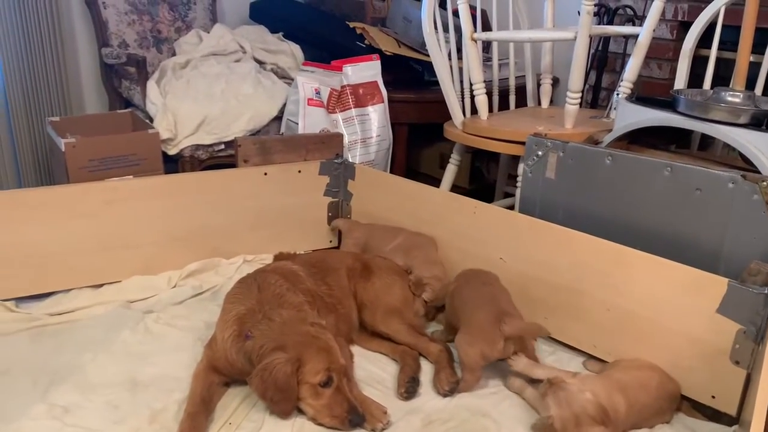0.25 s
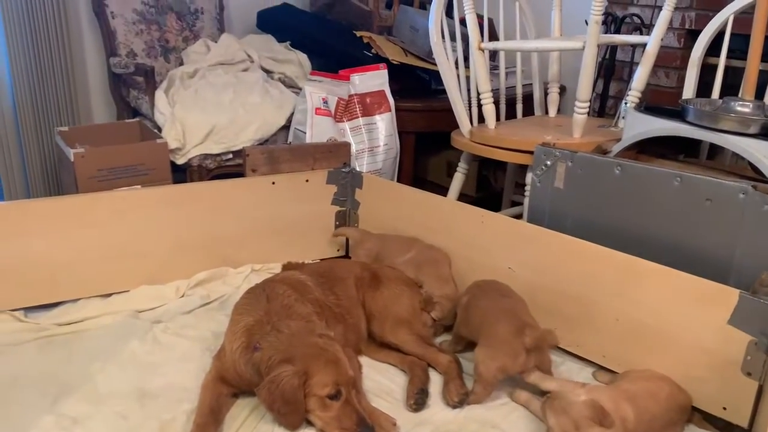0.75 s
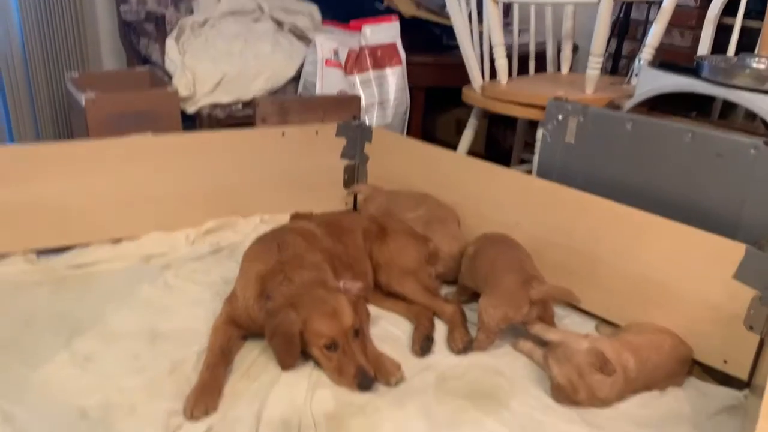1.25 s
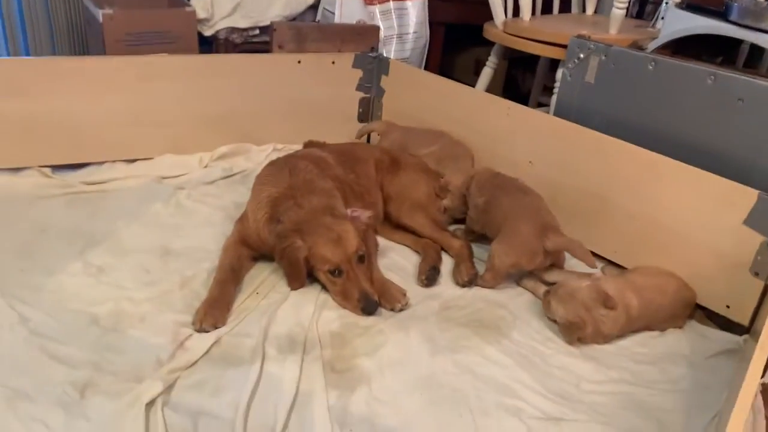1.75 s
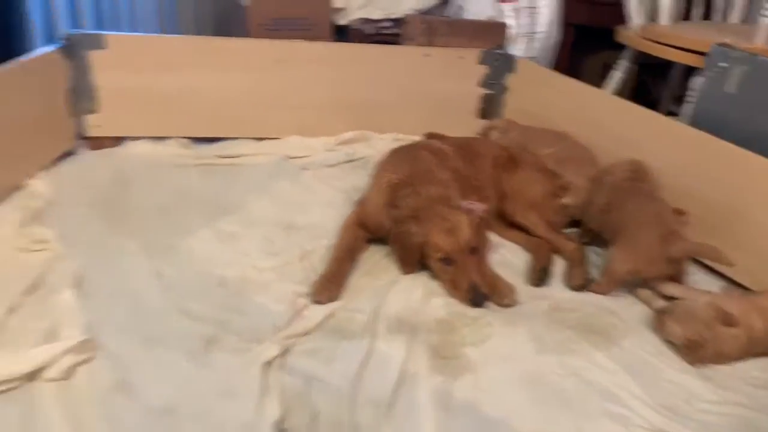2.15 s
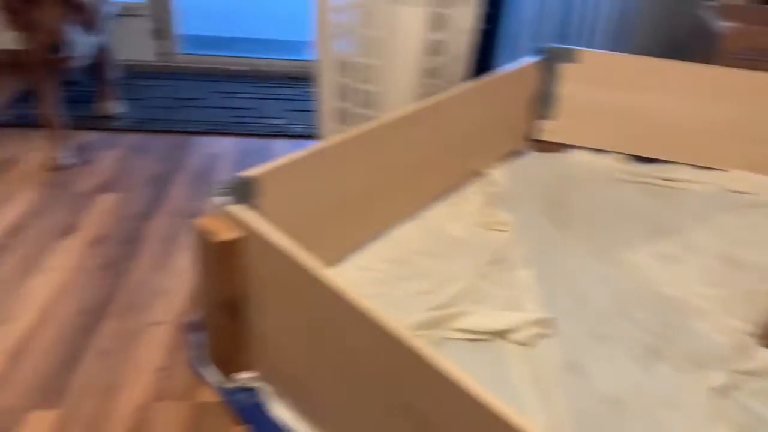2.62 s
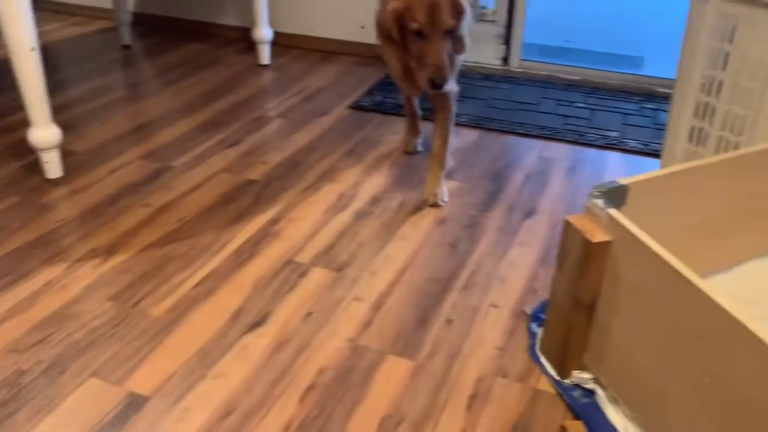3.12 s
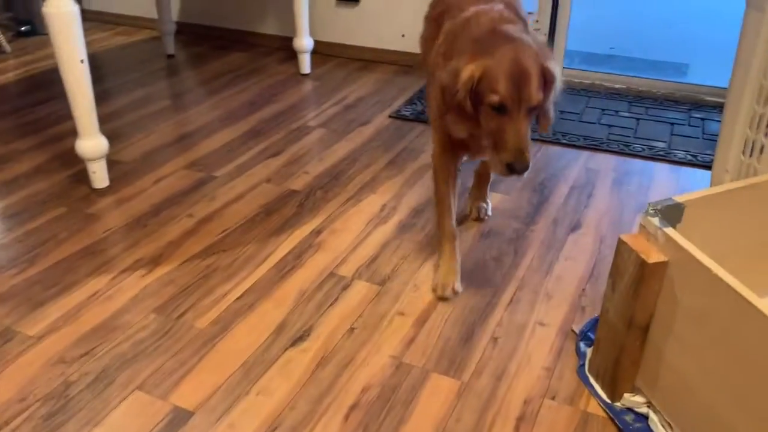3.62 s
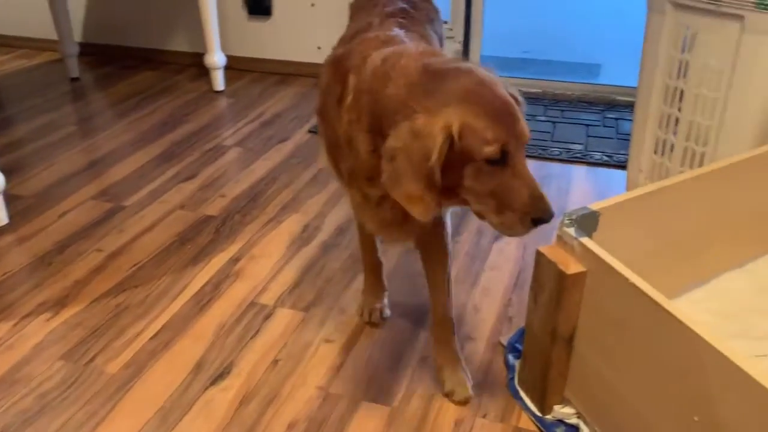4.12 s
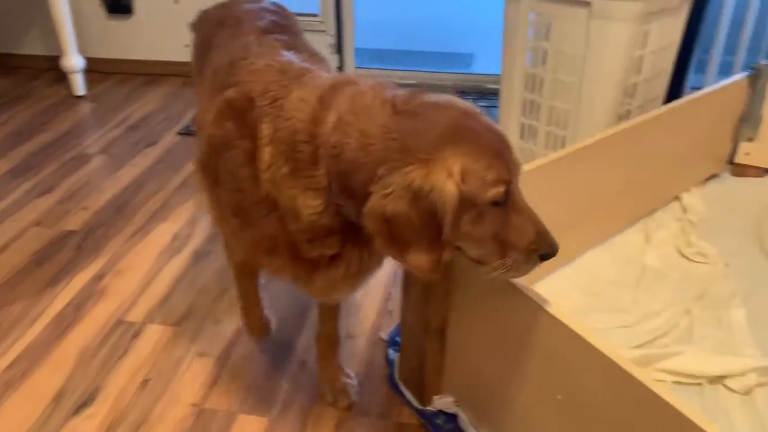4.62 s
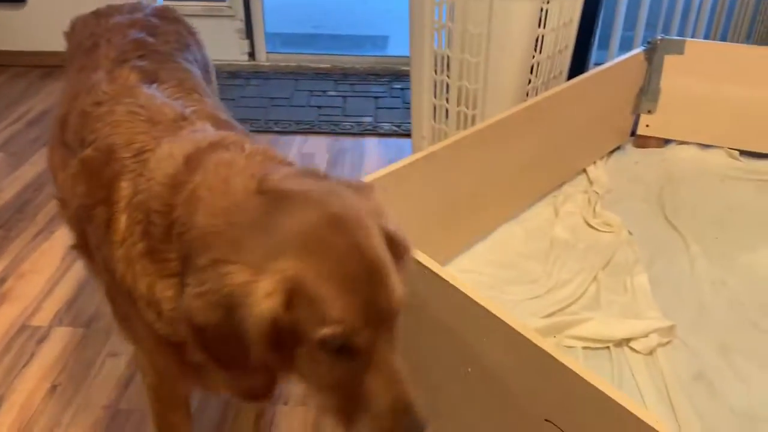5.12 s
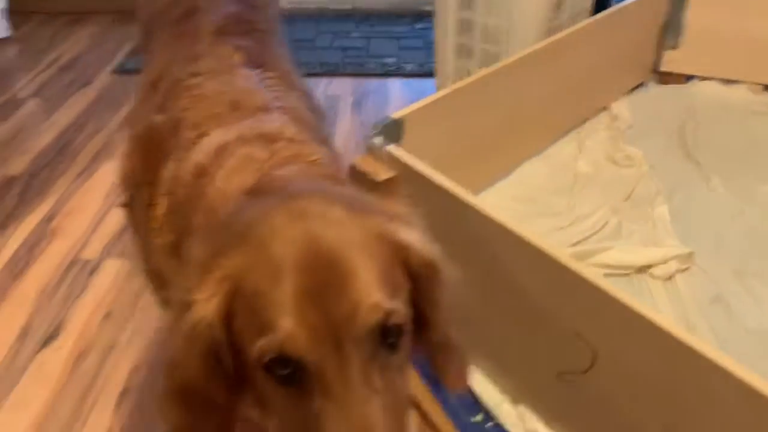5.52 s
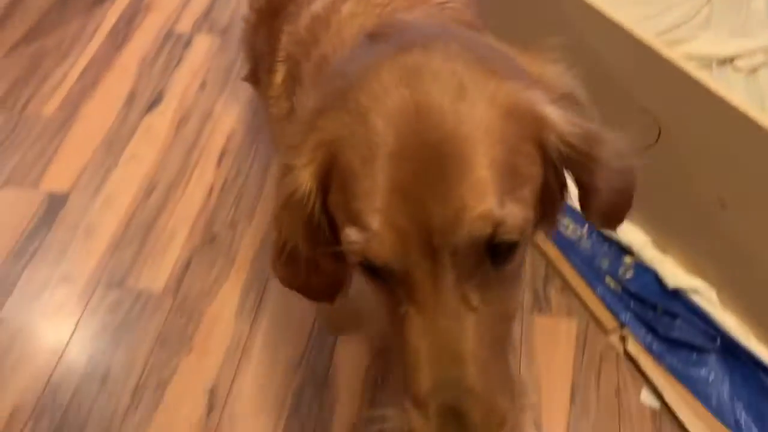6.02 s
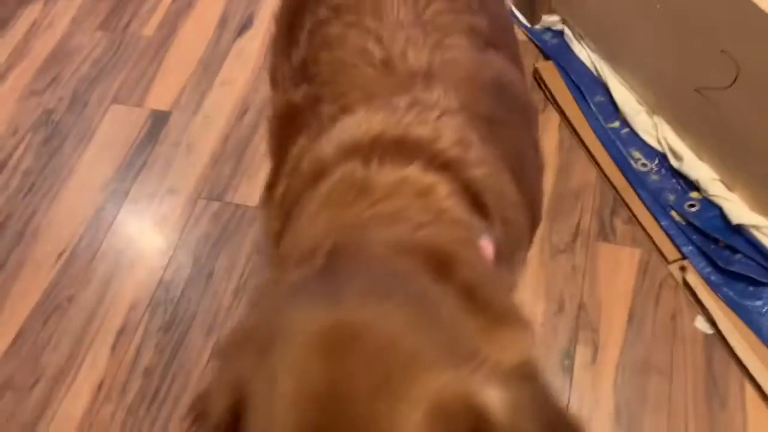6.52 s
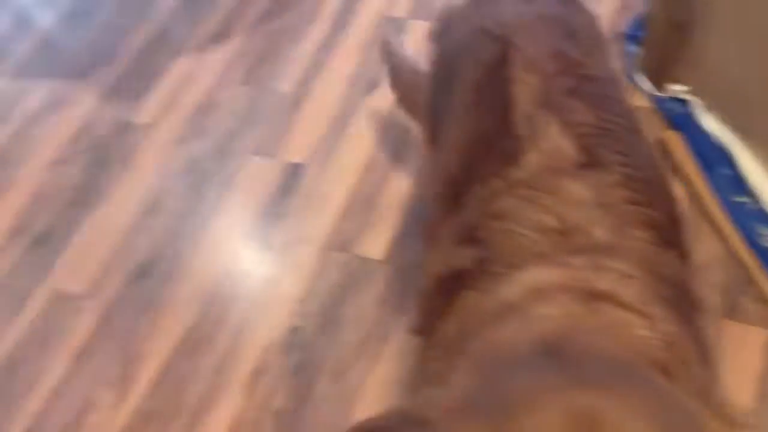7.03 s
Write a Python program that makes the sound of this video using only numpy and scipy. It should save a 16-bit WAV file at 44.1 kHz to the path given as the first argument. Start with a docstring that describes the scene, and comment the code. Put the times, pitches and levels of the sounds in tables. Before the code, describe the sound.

Handheld stereo microphone indoors, with a low appliance hum growing a little after the start. Hard objects tap and clatter lightly on wooden boards, followed by a cluster of soft steps and cloth rustle. Then three hard wooden knocks crack out with short room echo and low boom. Quiet follows, with small claw ticks and steps, until grainy fur rustling and one heavy low bump, then several smaller ones, arrive right at the microphone.

```python
"""Hard things are knocked about on wooden furniture: two light clatters, then three loud knocks.
Each knock is a burst of contacts coloured by resonances, which rings the board and booms in the floor.
Footfalls, a dog's claws and wooden taps are short noise contacts with the echo of the room.
Fur and cloth rustle as grainy noise, and a hand bumps the microphone in slow, falling swings.
Behind it all, wavering tones and fan noise make an appliance hum in a quiet room."""
import sys
import numpy as np
from scipy import signal
from scipy.fft import rfft, irfft
from scipy.io import wavfile
from scipy.ndimage import uniform_filter1d

SR = 44100
rng = np.random.default_rng(int(sys.argv[2]) if len(sys.argv) > 2 else 0)


def generate_wav(signal):
    """Clip the signal to [-1, 1] and save it as 16-bit WAV at the path in sys.argv[1]."""
    frames = np.transpose(np.atleast_2d(signal))
    scaled = np.clip(frames, -1, 1) * 32767
    pcm = np.round(scaled).astype(np.int16)
    wavfile.write(sys.argv[1], SR, pcm)


N = 320088  # length in samples
HZ = np.fft.rfftfreq(8192, 1 / SR)  # frequency grid on which sounds are coloured
BAND_LIMIT_HZ = 15700

# quiet of the room: freq_hz, level_db
AIR_SPECTRUM = [(18, -18.5), (35, -5), (60, -13), (85, -7.5), (130, 0.5), (180, -11), (300, -15.5),
                (700, -19), (1230, -27.5), (3500, -32.5), (6740, -37), (9070, -27), (14800, -36),
                (16000, -42)]
AIR_LEVEL_DB = -71.5
# steady tones of the appliance, before its loudness curve: pitch_hz, level_db
HUM_TONES = [(62, -75.5), (135, -76.5), (289, -70.5)]
# air noise of the appliance: freq_hz, level_db
FAN_SPECTRUM = [(20, -42.5), (45, 6.5), (70, -5.5), (250, -6.5), (450, -17.5), (1000, -23.5), (3000, -27.5),
                (7000, -39), (15000, -39.5)]
# loudness curve of the appliance as the microphone turns to it: time_s, gain_db
APPLIANCE_GAIN = [(0, -17.5), (2, -4), (3.2, 3.5), (4.8, -1.5), (7.25, 0.5)]

# decay time of the room's echo: freq_hz, t60_s
ROOM_DECAY = [(100, 0.81), (300, 0.62), (800, 0.66), (2500, 0.62), (5000, 0.63), (9000, 0.38),
              (15000, 0.17)]
# likeness of left and right, 1 identical, 0 unrelated, below 0 opposed: freq_hz, likeness
STEREO_LIKENESS = [(60, 0.84), (150, 0.76), (300, 0.47), (650, 0.09), (1400, -0.21), (3000, 0.17),
                   (15000, -0.39)]

# soft footfalls: start_s, level_db, centre_hz, length_s
FOOTFALLS = [(1.689, -63.5, 168, 0.0068), (1.809, -68, 170, 0.0085), (1.993, -54.5, 252, 0.02),
             (2.185, -46.5, 178, 0.011), (2.23, -45.5, 250, 0.0071), (2.338, -45, 137, 0.039),
             (2.41, -48.5, 183, 0.022), (2.553, -55, 181, 0.043), (3.056, -54, 134, 0.0057),
             (4.77, -62, 153.7, .0046), (4.963, -47.5, 200, 0.0077), (5.036, -52.5, 256, 0.05),
             (5.141, -50, 304, 0.018)]
# light taps on wood across the room: start_s, level_db, centre_hz, width_octaves
WOOD_TAPS = [(.669, -45.5, 2380, 0.41), (.69, -49.5, 820, 1.1), (0.938, -56, 501, 1.5),
             (1.245, -55, 514, 1.9), (1.428, -58, 1900, 0.87), (1.519, -63, 1481, 1.2),
             (1.661, -71, 1280, 1.03), (2.0, -59, 2250, 0.55), (2.035, -65.5, 1680, 1),
             (2.262, -52.5, 1140, .7), (2.412, -54.5, 1720, 1.2), (2.466, -61.5, 4150, 0.42),
             (4.561, -58.5, 2440, 1.08), (5.26, -57, 2530, 1.4)]
# bright ticks of claws and hard edges on the floor: start_s, level_db, centre_hz, scrape_s, room_db
CLAW_TICKS = [(0.816, -69, 3000, 0.0054, 4), (1.0775, -49.5, 4340, 0.00105, -13),
              (1.243, -64, 3900, 0.0041, 8), (1.359, -62, 8400, 0.0068, 5), (2.2593, -53.5, 3700, .001, 10),
              (2.833, -64, 6100, 0.0087, 18), (4.49, -58, 6430, 0.015, 13), (5.246, -54, 3600, 0.0013, -2),
              (5.511, -57.5, 3440, 0.0075, 1), (5.8886, -54.5, 2900, 0.0012, -3),
              (6.513, -50.5, 5440, .0011, -14), (6.527, -49, 2690, 0.0017, 6),
              (6.699, -48.5, 2430, 0.0025, 3.5)]
# modes of something hollow that is nudged: pitch_hz, level_db, t60_s
HOLLOW_MODES = [(396, -33.5, 0.11), (467, -40.5, .1), (333, -44.5, 0.12), (205, -42.5, 0.15)]
HOLLOW_START_S = 1.246
# small dry clicks of dog and hand by the microphone: start_s, level_db, centre_hz, width_octaves
CLOSE_CLICKS = [(5.047, -66, 4000, 0.18), (5.081, -68, 4000, 1.1), (5.1605, -56, 836, 0.33),
                (5.16, -64, 1960, 0.18), (5.786, -69, 4020, 1.8), (6.013, -54, 1440, 2.1),
                (6.054, -59.5, 535, 1.2), (6.114, -60, 563, .45), (6.27, -56.5, 446, 0.97),
                (6.369, -52.5, 357, 0.72), (6.394, -45, 150, 0.97), (6.613, -58, 304, 0.64),
                (6.669, -63, 3830, 0.48), (6.786, -57.5, 710, 0.51), (7.1748, -45, 315, 1.2),
                (7.2263, -52, 860, 0.29)]

# strokes of fur and cloth, before the trims in rustle(): peak_s, rise_s, fall_s, rustle_db, rumble_db
STROKES = [(2.241, .22, 0.16, -61, -53.5), (2.44, .055, 0.092, -61, -51.5), (5.22, 0.29, 0.16, -65, -71),
           (5.851, 0.096, 0.24, -61, -69), (6.26, 0.14, 0.34, -56, -51), (6.53, 0.11, .13, -52.5, -47),
           (6.73, 0.063, 0.27, -57.5, -54.5), (7.22, 0.4, 0.37, -55, -54)]
# tone of the fur: freq_hz, level_db
FUR_SPECTRUM = [(200, -21.5), (400, 0.5), (1130, -5), (3000, -8), (5400, -11.5), (6600, -11),
                (10000, -22.5), (14000, -28), (16000, -35)]
# tone of the hand on the housing: freq_hz, level_db
HAND_SPECTRUM = [(20, -50.5), (40, 5), (70, 0.5), (200, 0.5), (400, -11), (800, -15.5), (1600, -26.5),
                 (5000, -78)]
CRACKLES_PER_S = 22  # hairs and fibres that snap during a stroke
SLIPS_PER_S = 35  # small slips of the fingers on the housing
STROKE_ROUNDNESS = 1.34  # 1 is a pointed swell, 2 a bell

# pushes on the microphone housing, with the pitch each falls towards: start_s, peak_db, length_s, pitch_hz
HOUSING_PUSHES = [(6.004, -55, 0.084, 66.6), (6.136, -50, .058, 69.6), (6.371, -25, 0.057, 61.8),
                  (6.609, -38, 0.05, 58), (6.662, -46, .034, 101), (7.01, -43.5, 0.059, 98),
                  (7.044, -39, 0.056, 58.4), (7.081, -33, .043, 60.5), (7.107, -38, .07, 55.5),
                  (7.178, -34, 0.042, 91)]

# knocks: edge_s, edge_db, treble_db, hollowness_db, graze_db, graze_lead_s,
# landing_db, landing_delay_s, board_ring_db, floor_boom_db
KNOCK_EVENTS = [(.540, -39, -2, -1, -41.5, 0.012, -38.5, 0.027, -35, -68),
                (.668, -40, -25, -3.5, -50, 0.0066, -42, .012, -48, -58),
                (1.076, -42, -8, -1.5, -41, 0.0062, -48.5, .004, -42.5, -53),
                (1.346, -56, -35, -10, -52, 0.0058, -55.5, .011, -47, -55),
                (3.184, -34, 2.5, 3, -49.5, 0.021, -32, .016, -50, -47.5),
                (3.624, -24, 8.5, -0.5, -33, 0.021, -25, .006, -36.5, -36),
                (4.111, -26, 9.5, 3.5, -36, 0.011, -28, 0.0038, -30.5, -38.5)]
# basic spectrum of a knock: freq_hz, level_db
KNOCK_SPECTRUM = [(30, -27), (60, 5.5), (110, -7.5), (220, 6), (330, 1), (580, -6), (850, -3), (2000, -1),
                  (3200, -3), (5000, -7), (7200, -9), (9500, -5.5), (13000, -10), (16000, -17.5)]
# resonances of the knocked things: centre_hz, width_hz, lift_db
BODY_RESONANCES = [(433, 9.2, 6.5), (784, 18, 8.5), (854, 22, 4.5), (1081, 25, 8.5), (1293, 12, 5.5),
                   (1622, 18, 6.5), (1905, 18, 5), (2033, 70, 6), (2226, 220, 4), (2460, 49, 4.5),
                   (2640, 85, 1.5), (3090, 26, 7), (3520, 25, 2), (4600, 240, 3)]
# low modes of the board: pitch_hz, level_db, t60_s
BOARD_MODES = [(226.6, 6.5, 0.25), (203.3, -3.5, 0.34), (298, -21.5, 0.24)]
# low modes of the floor under the board: pitch_hz, level_db, t60_s
FLOOR_MODES = [(176, 4.5, 0.24), (122.9, 2, .36), (148, 1.5, 0.28), (87.3, -9.5, 0.77), (46.4, -20, 0.32)]
# a thing grazes, strikes with an edge, then lands flat: how long each contact rattles
GRAZE_S, EDGE_S, LANDING_S = 0.027, 0.008, 0.0071
GRAZE_TREBLE_DB, LANDING_TREBLE_DB = -7, -15  # against the edge
GRAZE_RISE, EDGE_RISE, LANDING_RISE = .9, 0.41, .8  # build-up, as a share of the rattle
GRAZE_SNAP, EDGE_SNAP, LANDING_SNAP = .1, 0.26, 0.089  # strength of the one sharp impact
BOUNCE_LAG, BOUNCE_DB = 1.6, -2.5  # time in landing delays, level against the landing
RING_DELAY_S = 0.0024  # the board and the floor answer just after the edge


def gain_of(db):
    """Turns decibels into an amplitude factor."""
    return 10 ** (np.asarray(db) / 20)


def read(points, hz):
    """Reads a table at hz, on a log-frequency axis."""
    freq, value = np.transpose(points)
    return np.interp(np.log(hz + 1), np.log(freq), value)


def add(mix, start_s, sound):
    """Lays a sound into the mix, cut at the end of the scene."""
    part = mix[:, round(start_s * SR):][:, :sound.shape[-1]]
    part += sound[..., :part.shape[1]]


def causal(db):
    """Minimum-phase impulse response of a spectrum, peak at 0 dB: it rings only after the blow."""
    log_gain = np.log(gain_of(np.maximum(db - db.max(), -90)))
    circle = np.concatenate([log_gain, log_gain[-2:0:-1]])
    return np.fft.ifft(np.exp(np.conj(signal.hilbert(circle)))).real


def diffuse(size):
    """Spectra of white noise at two microphones, as alike in each band as the room makes them."""
    a, b = rfft(rng.standard_normal((2, size)))
    same = np.clip(read(STEREO_LIKENESS, np.fft.rfftfreq(size, 1 / SR)), -1, 1)
    mid = a * np.sqrt((1 + same) / 2)
    side = b * np.sqrt((1 - same) / 2)
    return np.array([mid + side, mid - side])


def noise(spectrum):
    """Steady coloured stereo noise of rms 1."""
    colour = gain_of(read(spectrum, np.fft.rfftfreq(N, 1 / SR)))
    x = irfft(diffuse(size=N) * colour, N)
    return x / x.std()


def smooth_noise(first, second):
    """Random drift, smoothed by two running means (in samples)."""
    return uniform_filter1d(uniform_filter1d(rng.standard_normal(N), size=first), size=second)


def room(build_s, early_db=6, early_s=0.061):
    """Echo tail of energy 1 that builds up, is strong early on, then dies band by band."""
    hz, t, bands = signal.stft(irfft(diffuse(size=32768)), SR, nperseg=256)
    decay = gain_of(-60 * t / read(ROOM_DECAY, hz)[:, None])
    tail = signal.istft(bands * decay, SR)[1]
    t = np.arange(tail.shape[1]) / SR
    tail *= 1 - np.exp(-t / build_s)
    tail *= 1 + gain_of(early_db) * np.exp(-t / early_s)
    return tail / np.linalg.norm(tail[0])


def contact(colour_db, length_s, room_db, snap, rise, ripple_db=2.5, grain_db=4):
    """A short rattle of tiny impacts and its echo, coloured; as much energy as 30 ms at rms 1."""
    echo = room(build_s=length_s)
    size = echo.shape[1]
    t = np.arange(size) / SR
    grains = gain_of(grain_db * np.repeat(rng.standard_normal(size), 24)[:size])
    envelope = (1 - np.exp(-t / (rise * length_s))) * np.exp(-t / length_s)
    impacts = irfft(diffuse(size=size)) * grains * envelope
    sound = impacts / np.sqrt((impacts ** 2).mean(0).sum()) + gain_of(room_db) * echo
    # the hardest impact arrives straight at both microphones
    sound[:, int(rise * length_s * SR)] += snap
    # every spot that is struck favours different ones among the dense upper modes
    ripple = uniform_filter1d(rng.standard_normal(len(HZ)), size=24)
    ripple *= ripple_db / ripple.std() * HZ / (HZ + 300)
    sound = signal.fftconvolve(sound, causal(colour_db + ripple)[None], axes=1)
    return sound / np.sqrt((sound ** 2).mean(0).sum() / (.03 * SR))


def tap(db, hz, octaves, length_s, room_db, skirt_db, snap, rise=.33, top_hz=12000):
    """A small contact with one broad resonance and a gently softened top."""
    distance = np.log2((HZ + 1) / hz) / octaves
    colour = -skirt_db * np.log10(1 + distance ** 2 / 2) - 2 * (HZ / top_hz) ** 2
    return gain_of(db) * contact(colour, length_s, room_db, snap, rise)


def ring(modes, swell_s, room_db):
    """Low modes swell up after a blow, each up to 1 % off pitch, and die away with an echo."""
    t = np.arange(SR // 2) / SR
    tone = np.zeros(len(t))
    for hz, db, t60 in modes:
        pitch = hz * rng.uniform(.99, 1.01)
        tone += gain_of(db - 60 * t / t60) * np.sin(2 * np.pi * pitch * t)
    tone *= 1 - np.exp(-t / swell_s)
    paths = room(build_s=swell_s) * gain_of(room_db)
    paths[:, 0] += 1  # direct sound
    return signal.fftconvolve(tone[None], paths, axes=1)


def quiet_room():
    """Steady coloured noise for the air of the room."""
    return gain_of(AIR_LEVEL_DB) * noise(AIR_SPECTRUM)


def appliance(fan_db=-66.5, waver_turns=.15, swell_db=4.5):
    """Tones that drift randomly in phase and strength, over the air noise of a fan."""
    t = np.arange(N) / SR
    knots = np.arange(0, 8, 1 / 20)  # seconds, 20 drift points each
    tones = np.zeros(N)
    for hz, db in HUM_TONES:
        steps, swell = rng.standard_normal((2, len(knots)))
        turns = hz * t + waver_turns * np.interp(t, knots, np.cumsum(steps))
        strength = gain_of(db + swell_db * np.interp(t, knots, swell))
        tones += strength * np.sqrt(2) * np.sin(2 * np.pi * turns)
    loudness = gain_of(np.interp(t, *np.transpose(APPLIANCE_GAIN)))
    return (tones + gain_of(fan_db) * noise(FAN_SPECTRUM)) * loudness


def footfalls():
    """Soft feet on the floor: low, narrow contacts under a stronger echo."""
    out = np.zeros((2, N))
    for s, db, hz, length_s in FOOTFALLS:
        add(out, s, tap(db, hz, 0.68, length_s, room_db=4.5, skirt_db=28.5, snap=0.15))
    return out


def wood_taps():
    """Light taps on wood: brief contacts heard with the room."""
    out = np.zeros((2, N))
    for s, db, hz, octaves in WOOD_TAPS:
        add(out, s, tap(db, hz, octaves, length_s=0.00361, room_db=2, skirt_db=60, snap=0.14))
    return out


def hollow_nudge():
    """Something hollow is nudged and its low modes ring briefly."""
    out = np.zeros((2, N))
    add(out, HOLLOW_START_S, ring(HOLLOW_MODES, swell_s=0.0134, room_db=-4))
    return out


def claws():
    """Claws and hard edges tick on the floor: bright, wide contacts, each with its own echo level."""
    out = np.zeros((2, N))
    for s, db, hz, length_s, room_db in CLAW_TICKS:
        add(out, s, tap(db, hz, 1.92, length_s, room_db, skirt_db=38, snap=0.33))
    return out


def close_clicks():
    """Dog and hand click by the microphone: very short contacts with a sharp snap and little echo."""
    out = np.zeros((2, N))
    for s, db, hz, octaves in CLOSE_CLICKS:
        add(out, s, tap(db, hz, octaves, length_s=0.0017, room_db=-9.5, skirt_db=69.5, snap=0.81))
    return out


def fur_hiss(fur_db=-1, flicker_db=1.16, patch_db=2.0, crackle_db=19):
    """Rubbing noise broken into patches and fine grains, with sparse snaps of single fibres."""
    bands = signal.stft(noise(FUR_SPECTRUM), nperseg=512)[2]
    patches = rng.standard_normal(bands.shape[1:])
    patches = uniform_filter1d(patches, size=8, axis=0)  # across frequency
    patches = uniform_filter1d(patches, size=7, axis=1)  # across time
    hiss = signal.istft(bands * gain_of(patch_db * patches / patches.std()))[1][:, :N]
    grains = uniform_filter1d(rng.standard_normal(N), size=160)
    hiss *= gain_of(fur_db + flicker_db * grains / grains.std())
    snaps = rng.standard_normal((2, N)) * (rng.random(N) < CRACKLES_PER_S / SR)
    fibre = causal(read(FUR_SPECTRUM, HZ))
    fibre /= np.linalg.norm(fibre)
    crackle = signal.oaconvolve(snaps, fibre[None], axes=1)[:, :N]
    return hiss + gain_of(crackle_db) * crackle


def hand_rumble(hand_db=-4, lump_db=3, slip_db=25):
    """Lumpy low noise of a hand on the housing, with sparse thuds as the fingers slip."""
    lumps = smooth_noise(800, 500)
    rumble = noise(HAND_SPECTRUM) * gain_of(hand_db + lump_db * lumps / lumps.std())
    slips = rng.standard_normal(N) * (rng.random(N) < SLIPS_PER_S / SR)
    thud = causal(read(HAND_SPECTRUM, HZ))
    thuds = signal.oaconvolve(slips, thud / np.linalg.norm(thud))[:N]
    return rumble + gain_of(slip_db) * thuds


def rustle():
    """Strokes of fur and cloth swell and fade, the hand rumbling along with them."""
    t = np.arange(N) / SR
    fur_power, hand_power = np.zeros((2, N))
    for peak_s, rise_s, fall_s, rustle_db, rumble_db in STROKES:
        distance = np.maximum((peak_s - t) / rise_s, (t - peak_s) / fall_s)
        stroke = np.exp(-distance ** STROKE_ROUNDNESS)
        fur_power += (gain_of(rustle_db) * stroke) ** 2
        hand_power += (gain_of(rumble_db) * stroke) ** 2
    return fur_hiss() * np.sqrt(fur_power) + hand_rumble() * np.sqrt(hand_power)


def bumps(glide_s=0.0078, glide_depth=2.03):
    """A push on the housing: a few slow swings whose pitch drops as the hand settles."""
    out = np.zeros((2, N))
    for s, db, length_s, hz in HOUSING_PUSHES:
        t = np.arange(int(length_s * SR)) / SR
        pitch = hz * (1 + glide_depth * np.exp(-t / glide_s))
        turns = np.cumsum(pitch) / SR
        push = gain_of(db) * np.sin(np.pi * t / length_s) ** 2
        phase = np.array([[.3], [-.3]])  # radians, left and right
        add(out, s, push * np.sin(2 * np.pi * turns + phase))
    return out


def knocks(treble_hz=4200, hollow_hz=1500):
    """Graze, bright edge, duller landing and one bounce; each knock rings the board and the floor."""
    out = np.zeros((2, N))
    colour = read(KNOCK_SPECTRUM, HZ)
    for hz, width_hz, lift_db in BODY_RESONANCES:
        colour += lift_db / (1 + (2 * (HZ - hz) / width_hz) ** 2)
    treble = HZ ** 2 / (HZ ** 2 + treble_hz ** 2)
    hollow = np.exp(-2 * np.log2((HZ + 1) / hollow_hz) ** 2)
    for (s, edge_db, treble_db, hollow_db, graze_db, lead_s,
         landing_db, delay_s, board_db, floor_db) in KNOCK_EVENTS:
        graze = (s - lead_s, graze_db, GRAZE_TREBLE_DB, GRAZE_S, GRAZE_SNAP, GRAZE_RISE)
        edge = (s, edge_db, 0, EDGE_S, EDGE_SNAP, EDGE_RISE)
        flat = (LANDING_TREBLE_DB, LANDING_S, LANDING_SNAP, LANDING_RISE)
        landing = (s + delay_s, landing_db, *flat)
        bounce = (s + BOUNCE_LAG * delay_s, landing_db + BOUNCE_DB, *flat)
        for at_s, db, duller_db, rattle_s, snap, rise in (graze, edge, landing, bounce):
            tint = colour + (treble_db + duller_db) * treble + hollow_db * hollow
            add(out, at_s, gain_of(db) * contact(tint, rattle_s, room_db=2, snap=snap, rise=rise))
        # board and floor both lean to the right
        board = ring(BOARD_MODES, swell_s=0.021, room_db=-9.5) * gain_of([[-1.5], [1.5]])
        floor = ring(FLOOR_MODES, swell_s=0.0017, room_db=-9.0) * gain_of([[-2.5], [2.5]])
        add(out, s + RING_DELAY_S, gain_of(board_db) * board)
        add(out, s + RING_DELAY_S, gain_of(floor_db) * floor)
    return out * gain_of([[-.3], [.3]])


def scene():
    """All sources together, from the background to the knocks."""
    background = quiet_room() + appliance()
    small_sounds = footfalls() + wood_taps() + hollow_nudge() + claws() + close_clicks()
    return background + small_sounds + rustle() + bumps() + knocks()


def record(dry, notch_hz=11750, notch_width_hz=480, notch_db=-28):
    """The microphone has a narrow dip in the top octave; then comes the band limit."""
    dip = causal(notch_db * np.exp(-((HZ - notch_hz) / notch_width_hz) ** 2))
    heard = signal.oaconvolve(dry, dip[None], axes=1)[:, :N]
    low_pass = signal.firwin(511, BAND_LIMIT_HZ, window=("kaiser", 9), fs=SR)
    return signal.oaconvolve(heard, low_pass[None], "same")


dry = scene()
out = record(dry)
generate_wav(out)
```